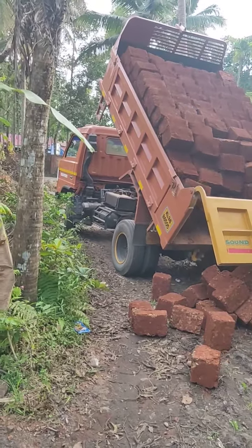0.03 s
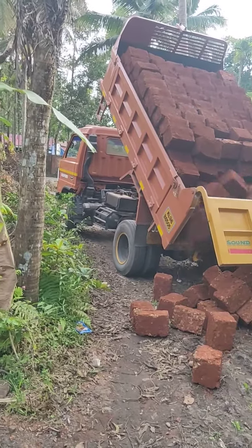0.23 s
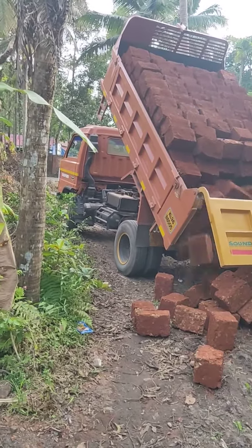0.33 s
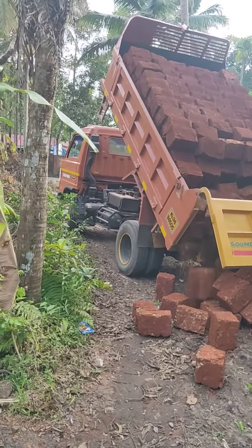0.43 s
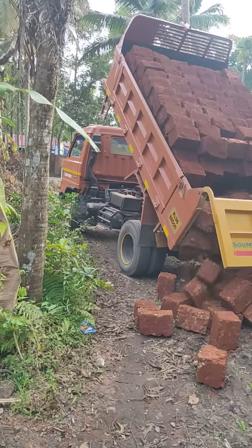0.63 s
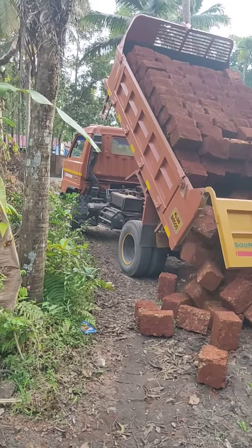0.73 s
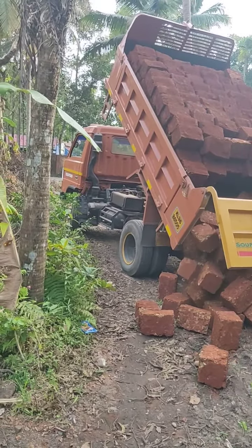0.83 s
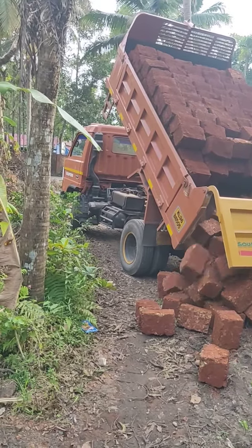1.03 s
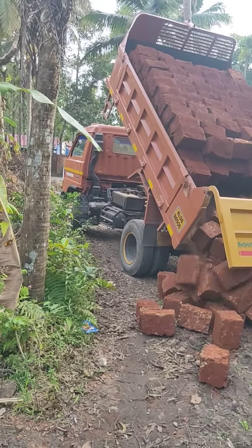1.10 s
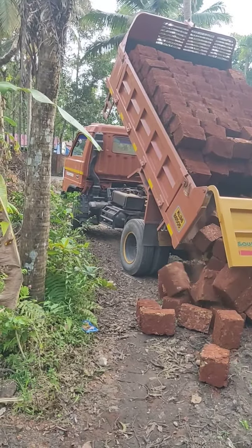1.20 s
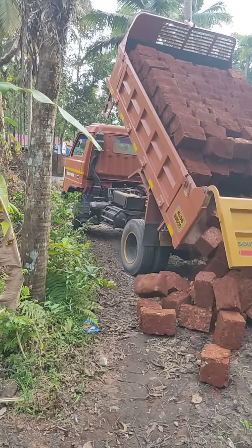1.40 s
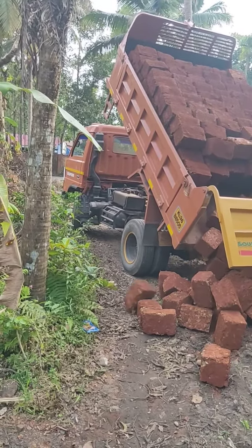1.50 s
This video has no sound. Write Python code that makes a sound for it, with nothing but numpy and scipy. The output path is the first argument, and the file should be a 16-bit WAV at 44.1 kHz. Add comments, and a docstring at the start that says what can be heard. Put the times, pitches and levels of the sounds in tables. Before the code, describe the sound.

Heavy stone blocks thud and clack as they slide off a tipper truck, engine idling underneath.

```python
"""On a dirt track, a tipper truck lets a load of rough stone blocks slide off its raised bed.
Blocks thud on the heap, clack and crunch against each other and grind down the steel floor with
hissing sand; one clangs and scrapes on the tailgate. Crushing and sliding are random clicks,
filtered; thuds, clacks and steel are decaying partials. The diesel ticks over underneath,
and trees and walls throw back a short echo of the stone."""
import sys
import numpy as np
from scipy import signal
from scipy.fft import rfft, irfft
from scipy.io import wavfile

SR = 44100
rng = np.random.default_rng(int(sys.argv[2]) if len(sys.argv) > 2 else 0)


def wav_out(sig):
    """Save sig, one row per channel (or a flat mono array), as 16-bit PCM at SR to the path in sys.argv[1]."""
    wavfile.write(sys.argv[1], SR, np.round(np.clip(np.atleast_2d(sig).T, -1, 1) * 32767).astype(np.int16))


N = 68355


def undb(db):
    """Decibels to gain."""
    return 10 ** (np.asarray(db) / 20)


def unit(x):
    """Scale to rms 1."""
    return x / np.sqrt(np.mean(x ** 2))


def since(start_s):
    """Seconds since start_s, zero before it."""
    return np.maximum(np.arange(N) / SR - start_s, 0)


def curve(points):
    """Gain over time from (time [s], level [dB]) points."""
    return undb(np.interp(since(0), *np.array(points).T))


def burst(start_s, rise_s, decay_s):
    """Linear rise, exponential decay."""
    t = since(start_s)
    return np.minimum(t / rise_s, 1) * np.exp(-np.maximum(t - rise_s, 0) / decay_s)


def convolve(x, impulse):
    """Pass x through an impulse response."""
    return signal.fftconvolve(x, impulse)[:N]


def response(colour, size=4096):
    """Minimum-phase impulse response from (frequency [Hz], gain [dB]) points."""
    hz, db = np.array(colour).T
    bins_hz = np.fft.rfftfreq(size, 1 / SR)
    gain = undb(np.interp(np.log(bins_hz + 1), np.log(hz), db))
    cepstrum = irfft(np.log(gain))
    cepstrum[1:size // 2] *= 2
    cepstrum[size // 2 + 1:] = 0
    return irfft(np.exp(rfft(cepstrum)))


def stereo(mid, side):
    """Mid and side to left and right."""
    return np.array([mid + side, mid - side])


def grains(rate_hz, scatter_db):
    """Tiny fractures: random clicks of scattered size, rms 1."""
    clicks = (rng.random(N) < rate_hz / SR) * rng.choice([-1, 1], N)
    return unit(clicks * undb(scatter_db * rng.standard_normal(N)))


# side relative to mid (frequency [Hz], gain [dB])
STEREO_WIDTH = [(30, -19), (125, -39), (300, -8.5), (600, -10.5), (1200, -3.5), (3000, -0.5), (6000, 0),
                (15000, -4.5)]


def grind(envelope, colour, rate_hz, scatter_db):
    """Enveloped grains through a unit-energy filter; widest in the treble."""
    body = response(colour)
    body /= np.linalg.norm(body)
    mid, side = (convolve(envelope * grains(rate_hz, scatter_db), body) for _ in range(2))
    return stereo(mid, convolve(side, response(STEREO_WIDTH)))


def echo(x, delay_s=0.011, t60_s=0.57, gain_db=-10):
    """Trees and walls scatter a short tail, slightly different on each side."""
    t = since(delay_s)
    decay = (t > 0) * undb(-60 * t / t60_s)
    colour = response([(100, -0.68), (700, 2.2), (3000, -2.0), (10000, -0.5)])
    width = response([(60, -23.5), (250, -24.5), (1000, -3.5)])
    tails = [convolve(rng.standard_normal(N) * decay, colour) for _ in range(2)]
    decay_energy = SR * t60_s / np.log(10 ** 6)
    mid, side = (convolve(x, tail) / np.sqrt(decay_energy) for tail in tails)
    return undb(gain_db) * stereo(mid, convolve(side, width))


# firing harmonics 2 to 6 (rms level [dB])
HARMONICS_DB = [-58, -55.5, -50.5, -51.5, -54.5]


def engine(firing_hz=27.13, chug_db=-50):
    """Idling diesel: a low hum with a soft chug at each firing."""
    phase = 2 * np.pi * firing_hz * since(0)
    hum = sum(undb(db) * np.sqrt(2) * np.sin(k * phase + 2 * np.pi * rng.random())
              for k, db in enumerate(HARMONICS_DB, start=2))
    chug = undb(chug_db) * (1 + 0.35 * np.sin(phase))
    colour = [(25, -7.5), (75, -1), (170, 12.5), (300, -37.5), (1500, 2.5), (6000, -55.0)]
    return hum + grind(chug, colour, rate_hz=4400, scatter_db=3)


# sand flow (time [s], level [dB])
SAND_ENVELOPE = [(0, -41), (.11, -46), (.18, -51.5), (.25, -49.5), (.31, -46), (.4, -49), (.55, -47),
                 (.7, -43), (.82, -48), (.96, -44), (1.12, -50), (1.23, -43.5), (1.36, -51.5), (1.55, -55)]
# sand and grit spectrum (frequency [Hz], relative gain [dB])
SAND_SPECTRUM = [(800, 3.5), (2600, 9.5), (3900, -5.5), (5200, 2), (6800, 1), (8500, -13.5), (11500, -26),
                 (15500, -16)]


def sand():
    """Sand hisses down the bed with the load."""
    return grind(curve(SAND_ENVELOPE), SAND_SPECTRUM, rate_hz=6400, scatter_db=1.5)


# grit bursts (time [s], level [dB])
GRIT_BURSTS = [(0.284, -35.5), (0.534, -37), (0.717, -37), (0.961, -43.5)]


def grit(rise_s=0.0032, decay_s=0.0086):
    """Grit pinched under a block bursts in bright ticks."""
    force = sum(undb(db) * burst(start, rise_s, decay_s) for start, db in GRIT_BURSTS)
    return grind(force, SAND_SPECTRUM, rate_hz=1500, scatter_db=3)


# sliding load (time [s], level [dB])
SLIDE_ENVELOPE = [(0, -27.5), (.04, -30), (.12, -37.5), (.19, -45.5), (.24, -47), (.3, -26.5), (.38, -34.5),
                  (.5, -36.5), (.56, -30.5), (.61, -31.5), (.69, -29), (.755, -34), (.82, -33.5),
                  (.92, -31), (1.04, -32.5), (1.1, -42), (1.2, -38), (1.55, -49.5)]
# sliding spectrum (frequency [Hz], relative gain [dB])
SLIDE_SPECTRUM = [(25, -53), (55, -7), (90, 4.5), (230, 3), (450, -3), (700, 0), (1050, -8.5), (1600, -12),
                  (2600, -21), (3800, -51.5), (9000, -48.5)]


def sliding():
    """Blocks judder down the bed with a low rumble."""
    return grind(curve(SLIDE_ENVELOPE), SLIDE_SPECTRUM, rate_hz=1500, scatter_db=2)


# tailgate blows (time [s], impulse level [dB], contact time [s])
TAILGATE_BLOWS = [(1.196, -27, 0.0001), (1.2055, -12.5, 0.00016)]
# tailgate and bed modes (frequency [Hz], level [dB], t60 [s])
STEEL_MODES = [(319, -12, 0.37), (452, -12, 0.18), (545, -17, .48), (614, -2, 0.45), (645, -14, 0.14),
               (688, -11, 0.18), (706, -7.5, 0.27), (973, -9.5, 0.28), (1012, -11, 0.18), (1120, -15, 0.42),
               (1214, -19, 0.75), (1249, -22, .45), (1600, -18, 0.44), (1890, -20, .22), (2035, -17, 0.33),
               (2544, -13, 0.23), (2615, -20, 0.22), (2966, -17, 0.26), (3106, -17, 0.24), (5249, -20, .22),
               (5665, -14, 0.2), (6643, -16, .22)]
# small contacts drive mostly high modes (frequency [Hz], gain [dB])
CHATTER_SPECTRUM = [(300, -15), (620, -17), (1000, 3.5), (2000, 7)]
# a plate radiates little bass (frequency [Hz], gain [dB])
PLATE_RADIATION = [(60, -31), (200, -13.5), (400, -1), (8000, -1)]


def steel(rattle_db=-29, bed_db=-55, side_db=-4.5):
    """A block strikes the tailgate and chatters; the sliding load keeps the steel ringing faintly."""
    t = since(0)
    partials = [undb(db - 60 * t / t60) * np.exp(2j * np.pi * hz * t) for hz, db, t60 in STEEL_MODES]
    modes = sum(partials).imag
    dephased = sum(partial * np.exp(2j * np.pi * rng.random()) for partial in partials).imag
    side_modes = convolve(dephased, response(STEREO_WIDTH))
    blows = 0
    for start, db, contact_s in TAILGATE_BLOWS:
        push = burst(start, contact_s / 2, contact_s / 2)
        blows += undb(db) * push / push.sum()
    rattle = undb(rattle_db) * burst(TAILGATE_BLOWS[0][0], rise_s=0.0032, decay_s=0.0091)
    bed_drag = undb(bed_db) * unit(curve(SLIDE_ENVELOPE))
    contacts = (rattle + bed_drag) * grains(rate_hz=1800, scatter_db=7.5)
    chatter = convolve(contacts, response(CHATTER_SPECTRUM)) / np.linalg.norm(modes)
    drive = convolve(blows + chatter, response(PLATE_RADIATION))
    return stereo(convolve(drive, modes), undb(side_db) * convolve(drive, side_modes))


# stone on steel (frequency [Hz], relative gain [dB])
SCRAPE_SPECTRUM = [(200, -14), (450, 6.5), (530, 1), (660, 16.5), (850, -4), (1010, 6.5), (1400, -1.5),
                   (2000, 1), (3200, -3), (4000, -22), (5500, -9), (6800, -16), (9500, -34.5), (15000, -49)]


def scrape(level_db=-21.5):
    """The block's edge bites into the tailgate at the first blow: a hollow rasp."""
    force = undb(level_db) * burst(TAILGATE_BLOWS[0][0], rise_s=0.0032, decay_s=0.037)
    return grind(force, SCRAPE_SPECTRUM, rate_hz=4300, scatter_db=2.5)


# edges crushing (time [s], level [dB], decay [s])
EDGE_CRUSHES = [(0.016, -38.5, 0.02), (0.088, -37.5, 0.013), (0.246, -27, 0.02), (0.2838, -23, 0.008),
                (0.293, -24.5, 0.03), (0.512, -35, 0.014), (0.54, -33.5, 0.019), (0.562, -35.5, 0.01),
                (0.63, -32, 0.019), (0.765, -28.5, 0.03), (1.022, -39.5, 0.016), (1.467, -38, 0.0076),
                (1.54, -41, 0.032)]
# crushing spectrum (frequency [Hz], relative gain [dB])
CRUNCH_SPECTRUM = [(100, -34), (500, 7.5), (1100, 5.5), (1700, 3), (2400, 0), (3200, -9.5), (4000, -21.5),
                   (5200, -13.5), (6800, -15.5), (9000, -36), (15000, -57)]


def crunches(rise_s=0.0032):
    """Edges crumble in short bright bursts."""
    force = sum(undb(db) * burst(start, rise_s, decay_s) for start, db, decay_s in EDGE_CRUSHES)
    return grind(force, CRUNCH_SPECTRUM, rate_hz=5000, scatter_db=2.5)


# stone on stone (time [s], level [dB], pitch [Hz])
STONE_HITS = [(.015, -24.5, 788), (.268, -20, 775), (.2835, -18.5, 2223), (.405, -24.5, 679),
              (.436, -20, 632), (.449, -21.5, 605), (.552, -38, 740), (.569, -19.5, 636), (.581, -18, 633),
              (1.006, -28, 519)]
# block modes (ratio to pitch, gain [dB])
BLOCK_MODES = [(0.871, -4.5), (1.002, -3.5), (1.13, -9)]


def clacks(rise_s=0.0021, decay_s=0.0069):
    """Two hard faces meet and the blocks ring for a few milliseconds."""
    out = 0
    for start, db, hz in STONE_HITS:
        envelope = burst(start, rise_s, decay_s)
        for ratio, mode_db in BLOCK_MODES:
            phase = 2 * np.pi * (hz * ratio * since(start) + rng.random())
            out += undb(db + mode_db) * envelope * np.sin(phase)
    return out


# landings on the heap (time [s], thud level [dB], thud pitch [Hz], contact time [s], knock level [dB])
BLOCK_LANDINGS = [(0.2449, -6, 276, 0.0065, -18), (.255, -5, 323, 0.0051, -19),
                  (.275, -25, 327, 0.0039, -26), (0.2872, -5.5, 220, 0.0068, -17),
                  (.303, -17.5, 258, 0.013, -28), (.3, -21, 98.6, .013, -36),
                  (0.321, -14.5, 191, 0.004, -21.5), (0.338, -19, 158, 0.0097, -25),
                  (0.358, -26, 182, .007, -32), (.445, -20, 221.5, 0.016, -30),
                  (0.556, -20, 300, 0.003, -25.5), (0.564, -15, 347, 0.0034, -24),
                  (.571, -24.5, 238, 0.0042, -35), (0.58, -23.5, 416, 0.0058, -29),
                  (.627, -16.5, 209, 0.0056, -27), (.649, -14.5, 347, 0.0074, -24.5),
                  (0.652, -19.5, 183, 0.0087, -35), (0.722, -21.5, 169, 0.0041, -44),
                  (.795, -29.5, 328, 0.014, -32.5), (0.881, -26.5, 128, 0.0083, -31.5),
                  (0.931, -19.5, 268, 0.0021, -32.5), (0.961, -17, 186, 0.0033, -46),
                  (0.981, -24.5, 262.6, 0.011, -37), (1.020, -16.5, 205, 0.0032, -42.5),
                  (1.268, -16, 212, 0.0038, -23.5), (1.375, -31, 165, 0.0037, -43)]
# knock spectrum (frequency [Hz], relative gain [dB])
KNOCK_SPECTRUM = [(40, -29), (110, -8.5), (250, 2.5), (500, -8), (760, -2.5), (1000, -17.5), (1300, -11.5),
                  (1800, -27.5), (3000, -31.5), (9000, -79.5)]


def knocks(rise_s=0.0018, decay_s=0.011):
    """The rough face of a landing block touches at many points in quick succession."""
    force = sum(undb(db) * burst(start, rise_s, decay_s) for start, _, _, _, db in BLOCK_LANDINGS)
    return grind(force, KNOCK_SPECTRUM, rate_hz=4100, scatter_db=2)


def thuds(overtone_ratio=1.2, overtone_db=-18, heave_ratio=0.47, heave_db=-19):
    """Each landing block pushes into the heap and shakes it for a few cycles."""
    out = 0
    for start, db, hz, contact_s, _ in BLOCK_LANDINGS:
        t = since(start)
        phase = 2 * np.pi * hz * t
        overtone = undb(overtone_db) * np.sin(overtone_ratio * phase)
        heave = undb(heave_db) * np.sin(heave_ratio * phase)
        push = (t / contact_s * np.exp(1 - t / contact_s)) ** 2  # peaks at contact_s
        out -= undb(db) * push * (np.sin(phase) + overtone + heave)
    return out


def scene():
    """Stone and its echo, ringing steel and the idling engine."""
    stones = thuds() + knocks() + clacks() + crunches() + grit() + scrape() + sliding() + sand()
    return stones + echo(stones.mean(axis=0)) + steel() + engine()


# microphone ports (frequency [Hz], left minus right [dB])
PORT_BALANCE = [(60, 0.5), (150, 0.6), (300, 1.7), (600, -3), (1100, .5), (2500, -0.3), (5000, 2),
                (7000, -11), (9000, -8), (12000, -0.5)]


def record(dry, left_lag_s=0.00009, cutoff_hz=15850):
    """Two microphone ports differ in colour, the left lags slightly; the top is cut."""
    hz = np.fft.rfftfreq(2 * N, 1 / SR)
    balance_hz, balance_db = np.array(PORT_BALANCE).T
    tilt = undb(np.interp(np.log(hz + 1), np.log(balance_hz), balance_db) / 2)
    ports = np.array([tilt * np.exp(-2j * np.pi * hz * left_lag_s), 1 / tilt])
    heard = irfft(rfft(dry, 2 * N) * ports)[:, :N]
    lowpass = signal.ellip(8, 0.2, 70, cutoff_hz, fs=SR, output="sos")
    return signal.sosfilt(lowpass, heard)


dry = scene()
out = record(dry)
wav_out(out)
```